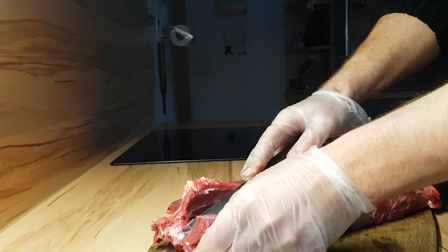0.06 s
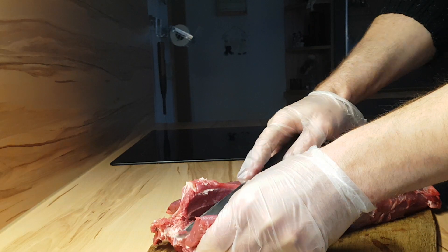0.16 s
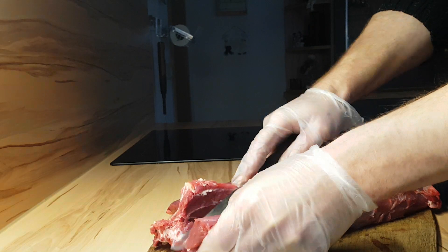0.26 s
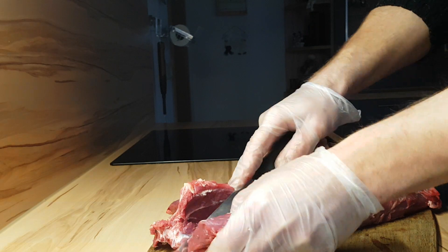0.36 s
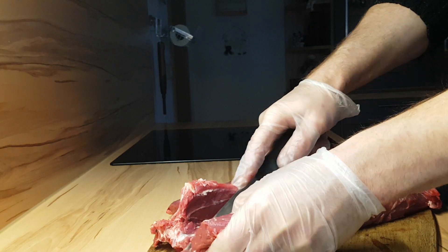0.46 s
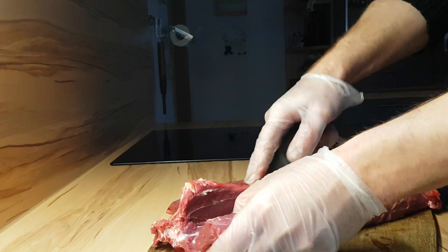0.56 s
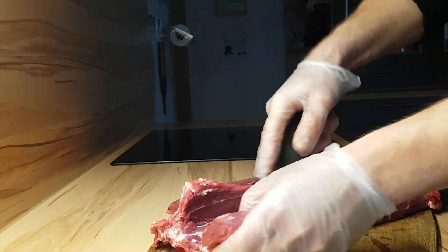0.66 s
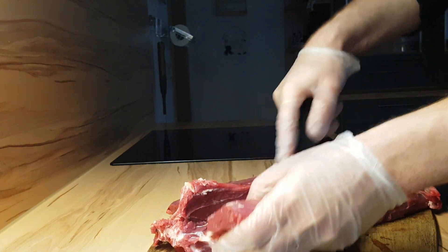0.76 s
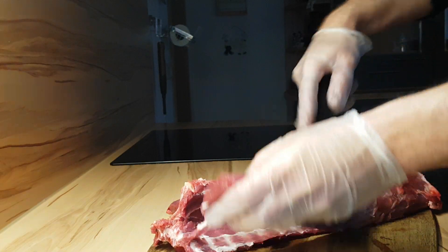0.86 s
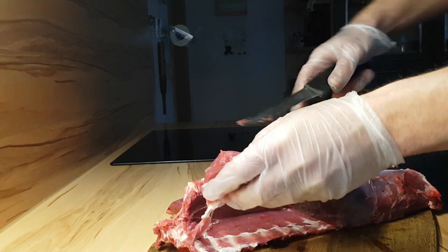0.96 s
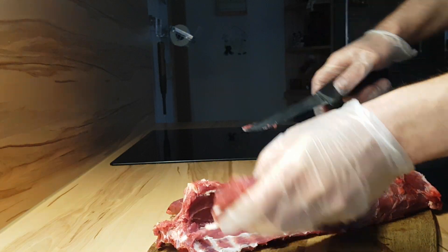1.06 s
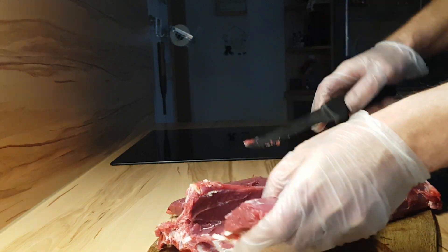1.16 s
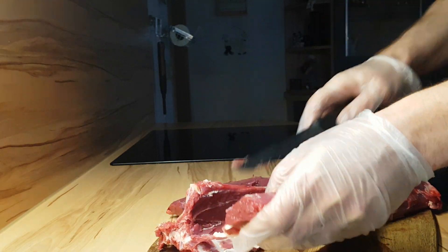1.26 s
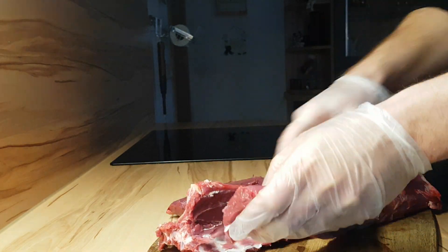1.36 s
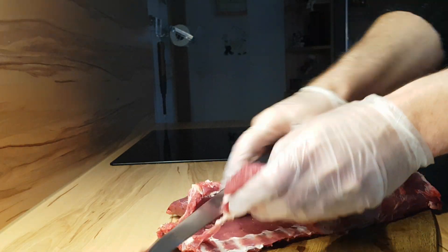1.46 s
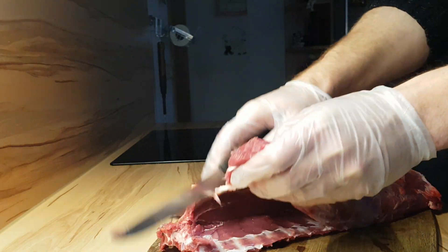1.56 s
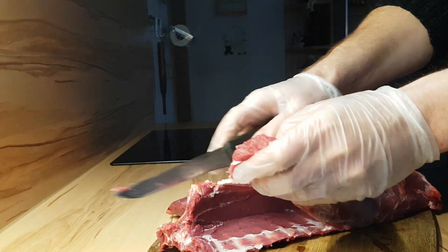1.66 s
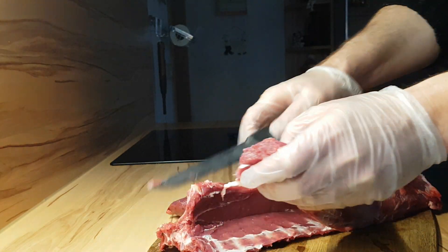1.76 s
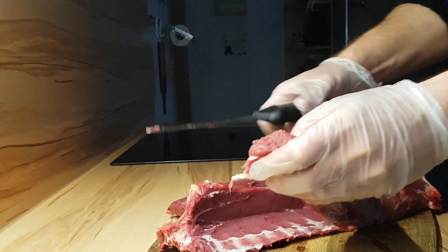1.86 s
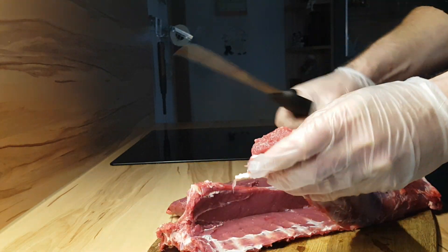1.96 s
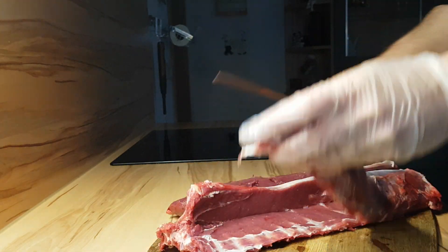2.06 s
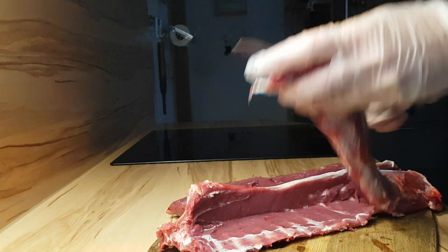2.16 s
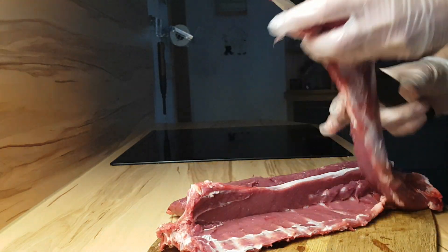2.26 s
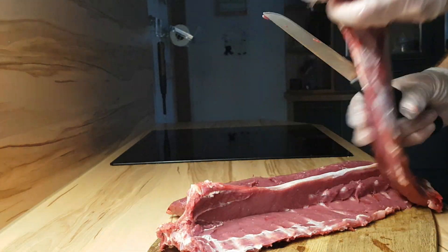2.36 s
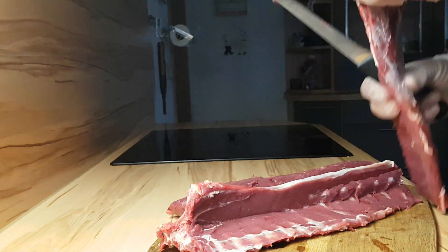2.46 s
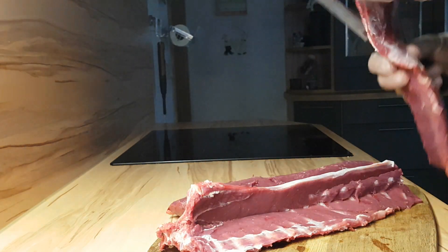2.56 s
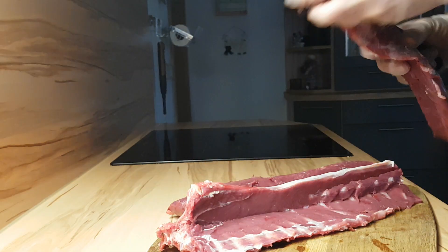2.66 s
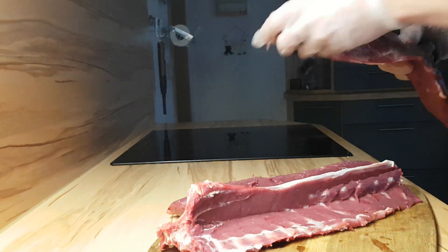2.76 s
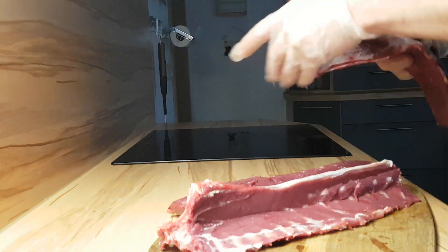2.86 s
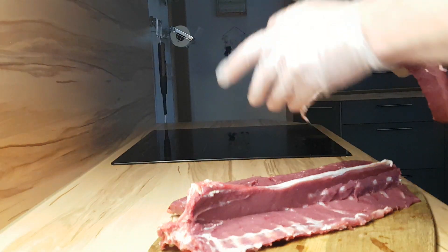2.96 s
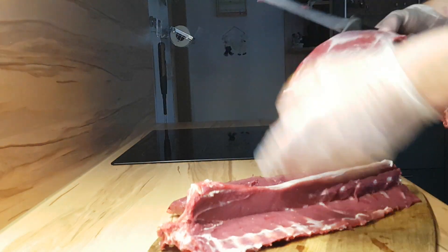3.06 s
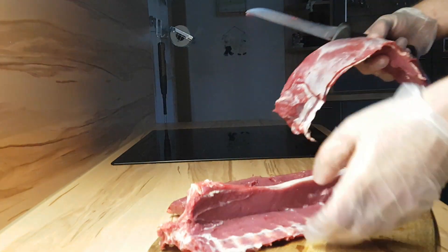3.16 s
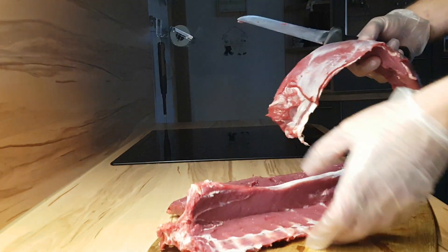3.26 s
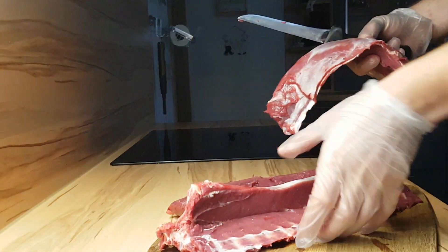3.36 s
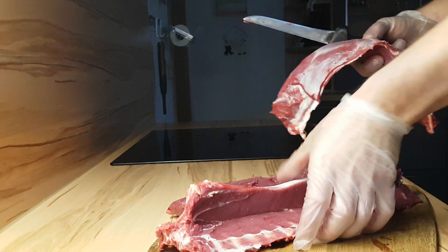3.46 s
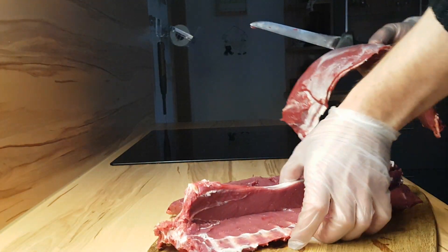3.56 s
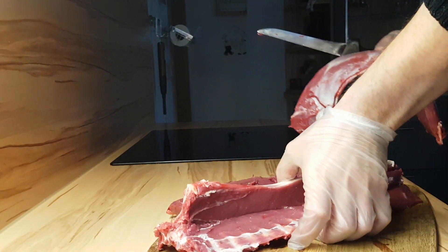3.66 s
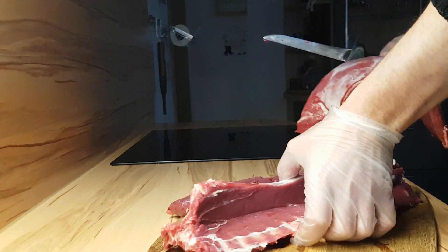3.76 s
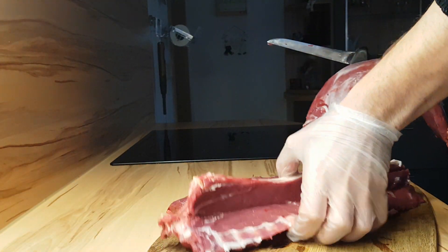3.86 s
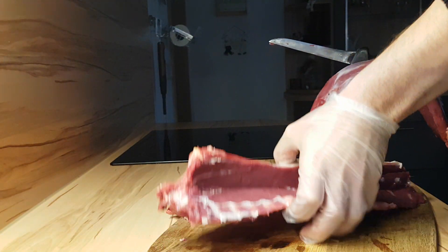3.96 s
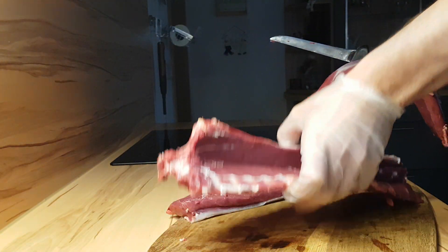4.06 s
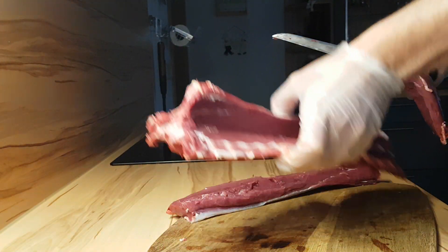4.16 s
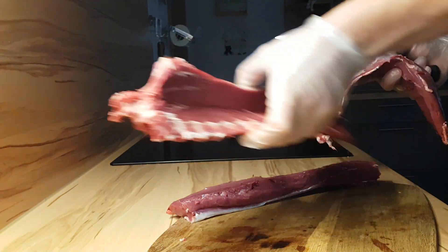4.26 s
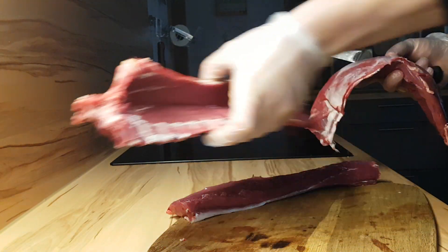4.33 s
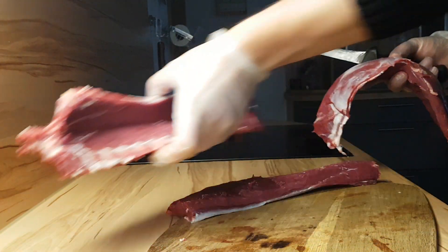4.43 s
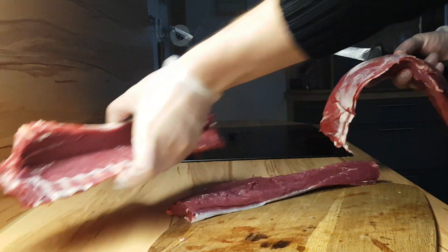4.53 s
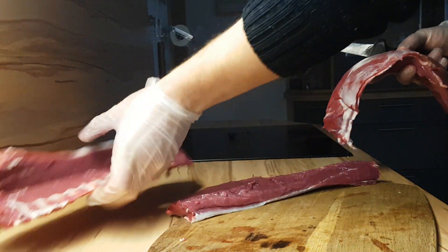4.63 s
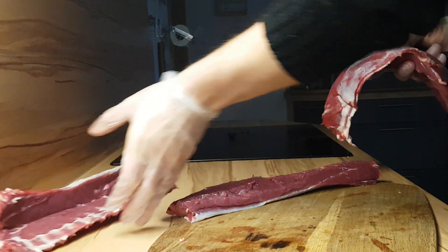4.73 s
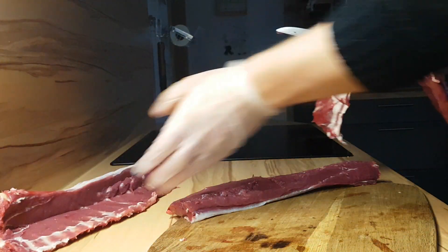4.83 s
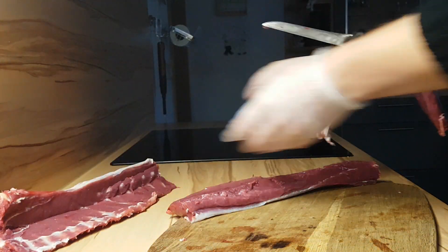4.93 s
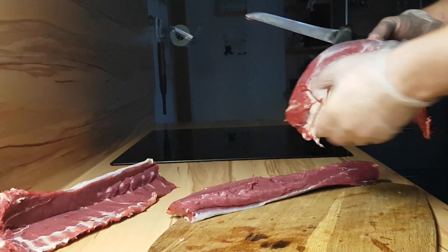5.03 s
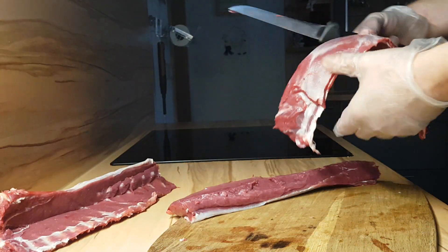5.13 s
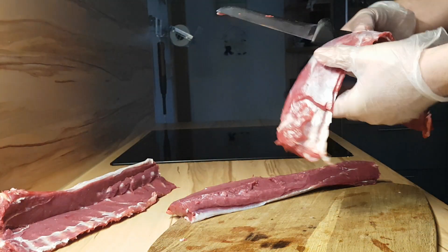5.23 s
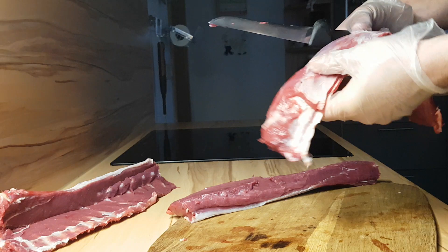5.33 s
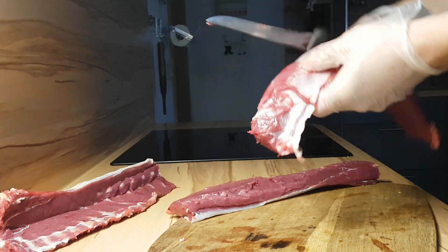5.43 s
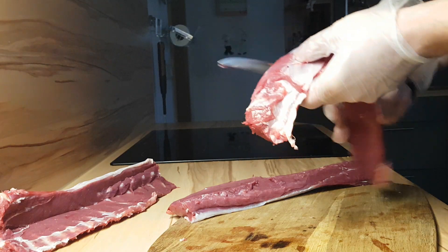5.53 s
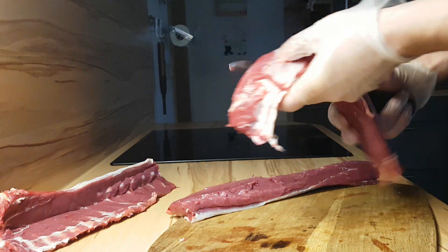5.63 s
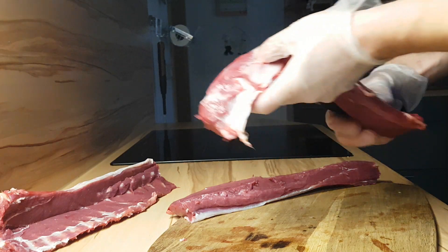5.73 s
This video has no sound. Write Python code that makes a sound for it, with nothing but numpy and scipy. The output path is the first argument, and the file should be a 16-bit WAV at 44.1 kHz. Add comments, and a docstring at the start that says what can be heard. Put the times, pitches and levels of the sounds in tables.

```python
"""Boning ribs in a quiet kitchen

A knife clicks on bone, meat flops onto a wooden board, gloved hands rub and peel it, and a rack of ribs
is dropped on the worktop, one edge first. Wood and steel are sums of decaying modes driven by a contact
push; slaps, tears, rubbing and squelches are shaped noise. The hard-walled room answers the work with a
decaying noise tail, over still air and a faint mains and appliance hum."""
import sys
import numpy as np
from scipy import signal
from scipy.fft import rfft, irfft
from scipy.io import wavfile
from scipy.ndimage import uniform_filter1d

SR = 44100
rng = np.random.default_rng(int(sys.argv[2]) if len(sys.argv) > 2 else 0)


def waveform_to_disk(signal):
    """Save audio, clipped to [-1, 1], as 16-bit WAV at the path in sys.argv[1]."""
    frames = np.transpose(np.atleast_2d(signal))
    scaled = np.clip(frames, -1, 1) * 32767
    samples = np.round(scaled).astype(np.int16)
    wavfile.write(sys.argv[1], SR, samples)


N = 255339
TIME = np.arange(N) / SR  # s
RING = TIME[:SR // 2]  # the half second given to each single sound, s

# vibration modes of the wooden board: [hz, level_db, t60_s]
BOARD_MODES = [(122, -21, 0.76), (184, -14, 0.04), (223, 2, 0.045), (229, -4, 0.068), (401, 0.5, 0.071),
               (435, -9, 0.12), (493, -3.5, 0.1), (633, -11, 0.15)]
# blade clicks on bone, each of which also splits wet flesh: [start_s, level_db]
BONE_CLICKS = [(.3445, -47.5), (.352, -44.5)]
# spectrum of a wet glove or of wet fibres parting: [hz, level_db]
WET_SPECTRUM = [(400, 3), (1000, 1.5), (1650, 2), (2400, 3), (4000, 2), (5500, -2.5), (9000, -6.5),
                (16000, -11)]
# a glove takes hold and slides, squeak relative to rub: [middle_s, length_s, level_db, squeak_db]
GLOVE_GRIPS = [(0.38, 0.084, -63.5, -11), (0.72, 0.063, -70.5, -15), (1.862, 0.1, -72, -10),
               (2.904, 0.12, -65, -9), (3.335, 0.078, -58.5, -1.5), (3.477, 0.043, -67.5, 2),
               (3.618, 0.1, -64, -2.5), (5.389, 0.11, -65.5, -14), (5.629, 0.051, -68, -12),
               (5.79, 0.05, -65.5, -12)]
# wet meat peels off blade, bone or glove: [middle_s, length_s, level_db]
MEAT_PEELS = [(0.319, 0.021, -60), (1.02, 0.08, -68.5), (2.026, 0.083, -56.5), (2.173, 0.066, -62.5),
              (2.329, 0.23, -70), (3.975, 0.085, -59.5), (4.075, 0.039, -62), (4.721, 0.042, -58),
              (5.488, 0.05, -57.5)]
# the hand bears down, skid relative to squelch: [middle_s, length_s, level_db, skid_db]
HAND_PRESSES = [(0.609, 0.06, -60, -13.5), (1.238, 0.07, -57, -11.5), (1.452, 0.04, -59.5, -6.5),
                (1.541, 0.068, -60, -20), (3.314, .025, -62.5, -4), (3.595, 0.05, -59.5, -1),
                (3.786, 0.03, -55, -2.5), (3.852, 0.05, -55.5, 0.5), (3.913, 0.046, -61.5, -10),
                (4.011, 0.035, -59, -1)]


def undb(db):
    """Amplitude ratio of a level in decibels."""
    return 10 ** (np.asarray(db) / 20)


def unit(x):
    """Normalization to a root-mean-square value of 1."""
    return x / np.sqrt(np.mean(x ** 2))


def along(points, hz):
    """Linear interpolation of (hz, value) points on a logarithmic frequency axis."""
    point_hz, value = np.transpose(points)
    return np.interp(np.log(hz + 1), np.log(point_hz), value)


def causal(x, log_gain):
    """Minimum-phase filtering by the folded cepstrum: nothing sounds before its cause."""
    size = x.shape[-1]
    cepstrum = irfft(log_gain, size)
    cepstrum[..., 1:size // 2] *= 2
    cepstrum[..., size // 2:] = 0
    response = np.exp(rfft(cepstrum))
    return irfft(rfft(x) * response, size)


def colour(x, points, tilt=0):
    """Spectral shaping by a response curve plus a tilt in dB per octave about 1 kHz."""
    hz = np.fft.rfftfreq(x.shape[-1], 1 / SR)
    octaves = np.log2(np.maximum(hz, 500) / 1000)  # the tilt stops below 500 Hz
    gain_db = along(points, hz) + tilt * octaves
    return causal(x, np.log(undb(gain_db)))


def low_cut(x, hz):
    """Third-order high-pass: a small surface radiates little at long wavelengths."""
    return signal.sosfilt(signal.butter(3, hz, "high", fs=SR, output="sos"), x)


def pair(size, alike):
    """Partial coherence: left and right white noise with the correlation `alike`."""
    c = np.clip(alike, 0, 1)
    shared = rng.standard_normal(size)
    separate = rng.standard_normal((2, size))
    return np.sqrt(c) * shared + np.sqrt(1 - c) * separate


def walk(rate, size=N):
    """Slow modulation: random values with a spread near 1, `rate` per second, joined by lines."""
    steps = rng.standard_normal(size // 20)
    return np.interp(TIME[:size] * rate, np.arange(len(steps)), steps)


def add(out, s, sound):
    """Superposition of a sound from time s onward."""
    i = int(s * SR)
    out[:, i:i + sound.shape[-1]] += sound[..., :N - i]


def swell(length):
    """A rounded envelope centred in the half second; `length` spans its points at 61 % of the peak."""
    return np.exp(-np.abs(2 * (RING - RING.mean()) / length) ** 2.24 / 2)


def strokes(moves):
    """Amplitude envelopes of movements (middle_s, length_s, level_db, sound): each swells and fades."""
    out = np.zeros((2, N))
    for s, length, db, sound in moves:
        add(out, s - RING.mean(), undb(db) * swell(length) * sound)
    return out


def strike(modes, contact_ms):
    """Modal excitation by a push; a longer, softer contact leaves only the low modes."""
    ring = np.zeros(len(RING))
    for hz, db, t60 in modes:
        ring += undb(db - 60 * RING / t60) * np.sin(2 * np.pi * hz * RING)
    ms = RING * 1000
    push = ms * np.exp(-2 * np.pi * ms / max(contact_ms, .1))
    return signal.fftconvolve(ring, push / push.sum())[:len(RING)]


def splat(spectrum, tilt, decay_ms, alike):
    """Aperiodic radiation as air and juice leave a wet contact: a dying crackle without pitch."""
    fade = np.exp(-RING * 1000 / decay_ms)
    burst = pair(len(RING), alike) * fade
    power = uniform_filter1d(np.abs(rfft(burst)) ** 2, size=60)
    even = causal(burst, -np.log(power) / 2)  # flatten before colouring
    return unit(colour(even, spectrum, tilt)) * np.sqrt(np.mean(fade ** 2))


def rub(spectrum, tilt=0):
    """Friction noise of a sliding wet contact, tilted in dB per octave."""
    return unit(colour(pair(len(RING), alike=0.2), spectrum, tilt))


def diffuse(x):
    """Spectral smoothing of a noise tail, so that no chance resonance stands out."""
    power = uniform_filter1d(np.abs(rfft(x)) ** 2, size=21)
    return causal(x, -np.log(power / power.mean()) / 2)


def background():
    """Ambient noise, coherent between the sides in the bass, and hum of wavering level and phase."""
    # spectrum of the still air: [hz, level_db]
    air_spectrum = [(45, -9), (75, 0), (115, 2.5), (200, -2.5), (480, -4), (650, -8), (900, -9.5),
                    (1600, -14), (3000, -17.5), (6500, -27.5), (10000, -28.5), (15500, -22)]
    # mains and appliance hum, mean level: [hz, level_db]
    hum_tones = [(49, -77.5), (98, -74.5), (344.5, -80), (490, -74), (10896, -100)]
    air_db = -65  # rms over both sides
    mid, side = pair(N, alike=0)
    side = low_cut(side, hz=286) + 0.3 * side
    air = low_cut(colour(np.array([mid + side, mid - side]), air_spectrum), hz=40)
    hum = np.zeros(N)
    for hz, db in hum_tones:
        level = undb(db + 1.5 * walk(3.8))
        hum += level * np.sin(2 * np.pi * hz * TIME + 0.66 * walk(4.4))
    return undb(air_db) * unit(air) + hum


def kitchen(dry, wet_db, build_s, apart_hz):
    """Reverberation: a dense tail loses its treble first; long waves reach both sides alike."""
    # reverberation time: [hz, t60_s]
    room_t60 = [(100, 0.44), (1200, 0.44), (3000, 0.44), (6000, 0.36), (12000, 0.26)]
    # spectrum of the echo: [hz, level_db]
    echo_spectrum = [(100, -3), (220, 2.5), (300, 3), (450, 4.5), (800, -0.5), (1400, 1.5), (3000, -2),
                     (15000, -4)]
    hz, t, cells = signal.stft(pair(int(.7 * SR), alike=0), SR, nperseg=256)
    fade = undb(-60 * t / along(room_t60, hz)[:, None])
    echoes = signal.istft(cells * fade, SR)[1]
    build = 1 - np.exp(-(TIME[:echoes.shape[1]] / build_s) ** 2)
    mid, side = colour(diffuse(echoes * build), echo_spectrum)
    side = low_cut(side, apart_hz)
    tail = np.array([mid + side, mid - side])
    return undb(wet_db) * signal.fftconvolve(dry, tail, axes=1)[:, :N]


def faint_tone(s, length, hz, db):
    """A pure tone under a smooth envelope: low and faint, it swells and fades."""
    return strokes([(s, length, db, np.sin(2 * np.pi * hz * RING))])


def board_bumps():
    """Soft-contact excitation of the board as it is bumped in the work and pushed by each press."""
    # bumps as the knife works and the meat is moved: [start_s, level_db]
    nudges = [(0.31, -43.5), (0.326, -40.5), (0.377, -44.5), (.398, -42), (0.453, -46.5), (1.088, -47.5),
              (4.079, -49)]
    push_db = 3.5  # relative to the squelch of the press
    out = np.zeros((2, N))
    bump = strike(BOARD_MODES, contact_ms=4.8)
    push = strike(BOARD_MODES, contact_ms=2.14)
    for s, db in nudges:
        add(out, s, undb(db) * bump)
    for s, length, db, _ in HAND_PRESSES:
        add(out, s - length / 2, undb(db + push_db) * push)
    return low_cut(out, hz=108)


def wet_tacks():
    """Adhesion release: short wet crackles as meat and gloves come unstuck."""
    # tilt in dB per octave: [start_s, level_db, tilt_db]
    tacks = [(.607, -59.5, 6.5), (1.235, -60, 5), (2.703, -52, 1), (3.451, -50, -8.5), (3.991, -53, 4),
             (4.72, -43.5, -3), (5.612, -51.5, 0)]
    out = np.zeros((2, N))
    for s, db, tilt in tacks:
        add(out, s, undb(db) * splat(WET_SPECTRUM, tilt, decay_ms=5, alike=0.22))
    return low_cut(out, hz=108)


def squelch():
    """Collapse of small air pockets under wet meat: a dull, lumpy gurgle."""
    # spectrum of the air pockets: [hz, level_db]
    pockets = [(70, -21.5), (140, 3.5), (220, 13.5), (310, -10), (500, -2), (1000, -9.5), (3000, -31)]
    pops = pair(len(RING), alike=.8) * undb(3.5 * walk(500, size=len(RING)))
    return unit(colour(pops, pockets))


def squelches():
    """Compression of wet meat by every movement: a press fully, a grip or a peel only lightly."""
    # squelch relative to the level of each movement, dB
    kinds = [(HAND_PRESSES, 0), (GLOVE_GRIPS, -10), (MEAT_PEELS, -14)]
    moves = []
    for rows, squeeze_db in kinds:
        for s, length, db, *_ in rows:
            moves.append((s, length, db + squeeze_db, squelch()))
    return strokes(moves)


def squeak():
    """Stick-slip of taut rubber: narrow-band chatter, stretched a little differently in each grip."""
    # spectrum of the squeak before stretching: [hz, level_db]
    squeak_band = [(2400, -38), (2950, -1), (3150, 6.5), (3500, -5), (4500, -19)]
    slips = pair(len(RING), alike=.3) * undb(5.5 * walk(260, size=len(RING)))
    stretch = np.exp(.025 * rng.standard_normal())
    return unit(colour(slips, [(hz * stretch, db) for hz, db in squeak_band]))


def gloves():
    """Sliding friction in tiny uneven slips: grips squeak, peels hiss and presses skid dully."""
    # bright hiss of peeling: [hz, level_db]
    peel_spectrum = [(500, -2.5), (1500, 1.5), (2300, 6.5), (3200, 4.5), (4500, 1.5), (7000, 1),
                     (11000, -1.5), (16000, -2.5)]
    moves = []
    for s, length, db, squeak_db in GLOVE_GRIPS:
        moves.append((s, length, db, rub(WET_SPECTRUM, tilt=-0.12) + undb(squeak_db) * squeak()))
    for s, length, db in MEAT_PEELS:
        moves.append((s, length, db, rub(peel_spectrum)))
    for s, length, db, skid_db in HAND_PRESSES:
        moves.append((s, length, db + skid_db, rub(WET_SPECTRUM, tilt=-2.8)))
    slip_db = 2 * walk(110) + 3.2 * walk(1200)
    return low_cut(strokes(moves) * undb(slip_db), hz=131)


def tearing():
    """Fracture as the loin leaves the ribs: fine fibres tick at uneven gaps, thick strands snap."""
    # strands of membrane snapping: [start_s, level_db]
    snaps = [(2.285, -53), (2.33, -51.5), (2.404, -51)]
    # span of the pull: start_s, end_s
    tear_span = (2.13, 2.47)
    fibres_per_s = 40
    loudest_db, range_db = -53.5, 12  # fibres fall up to the range below the loudest
    out = np.zeros((2, N))
    for s, db in snaps:
        add(out, s, undb(db) * splat(WET_SPECTRUM, tilt=6.5, decay_ms=3.9, alike=0.13))
    for s in np.arange(*tear_span, 1 / fibres_per_s):
        db = loudest_db - range_db * rng.random()
        tick = splat(WET_SPECTRUM, tilt=11, decay_ms=2.3, alike=0.22)
        add(out, s + rng.random() / fibres_per_s, undb(db) * tick)
    return out


def flesh_cuts():
    """Rupture of wet flesh: a short crackle with each click of the blade."""
    cut_db = -0.5  # relative to the click
    out = np.zeros((2, N))
    for s, db in BONE_CLICKS:
        add(out, s, undb(db + cut_db) * splat(WET_SPECTRUM, tilt=-3.5, decay_ms=10, alike=0.27))
    return low_cut(out, hz=108)


def blade():
    """Modal ringing of steel after a brief, hard contact with bone."""
    # modes of blade against bone: [hz, level_db, t60_s]
    blade_modes = [(903, 0, 0.034), (1170, -6, 0.042), (1515, 3, 0.05), (2225, 1.5, 0.047),
                   (2850, -1, 0.042), (3570, -22, 0.017)]
    out = np.zeros((2, N))
    for s, db in BONE_CLICKS:
        add(out, s, undb(db) * strike(blade_modes, contact_ms=0.36))
    return out


def landings(blows, modes, slap_spectrum, lowest_hz):
    """Impact of a soft body: the wood thuds in its modes and the wet face slaps."""
    out = np.zeros((2, N))
    for s, thud_db, contact_ms, slap_db, decay_ms, tilt in blows:
        add(out, s, -undb(thud_db) * strike(modes, contact_ms))
        add(out, s, undb(slap_db) * splat(slap_spectrum, tilt, decay_ms, alike=0.12))
    return low_cut(out, lowest_hz)


def meat_flop():
    """Impact of limp meat on the board, exciting board modes and a wet slap."""
    # tilt in dB per octave: [start_s, thud_db, contact_ms, slap_db, slap_decay_ms, slap_tilt_db]
    flops = [(.7572, -47, 2.2, -28.5, 7.6, -1), (.7612, -22, 1.44, -30.5, 8.3, -7)]
    # spectrum of the slap: [hz, level_db]
    meat_spectrum = [(80, -13), (560, 1.5), (800, -10), (1200, -5), (1600, -1), (2300, -5), (3100, -1.5),
                     (5000, -10.5), (9000, -16.5), (16000, -30)]
    return landings(flops, BOARD_MODES, meat_spectrum, lowest_hz=162)


def rack_drop():
    """Successive impacts of the rack of ribs, one edge first, exciting the worktop modes."""
    # tilt in dB per octave: [start_s, thud_db, contact_ms, slap_db, slap_decay_ms, slap_tilt_db]
    drops = [(4.758, -34.5, 3.6, -23, 30, -0.5), (4.7625, -15, 4.5, -27, 18, -1),
             (4.7855, -37.5, 1.9, -19.5, 7.2, 0.5), (4.7885, -14.5, 1.02, -13.5, 9.6, -6.5),
             (4.872, -42, 2, -27, 2.4, -4.5)]
    # modes of the worktop: [hz, level_db, t60_s]
    worktop_modes = [(107.3, -7.5, 0.34), (126.8, -3.5, 0.25), (155.3, -12.5, .22), (191.4, -3, 0.12),
                     (208.6, -4.5, .22), (238, -10.5, 0.2), (378, -10, 0.1), (444, -10.5, 0.11),
                     (498.3, -6.5, 0.14), (669, -6, 0.14), (838, -12.5, 0.088), (933, -14, 0.093),
                     (1180, -12, 0.069)]
    # spectrum of the slap: [hz, level_db]
    rib_spectrum = [(70, -28), (150, -7.5), (310, -11.5), (450, 1.5), (750, 4), (1400, 0), (2200, -2.5),
                    (3200, -5.5), (6500, -13.5), (9000, -20), (16000, -26.5)]
    return landings(drops, worktop_modes, rib_spectrum, lowest_hz=86)


def scene():
    """Superposition of direct sound, just in front of the microphone, with room and background."""
    # level of the work area, left minus right: [hz, level_db]
    balance = [(60, -1), (200, -3.5), (380, -3.5), (700, -3.5), (2400, 0), (5500, 3.5)]
    blade_room_db = -7  # the thin blade sends little into the room
    dry = board_bumps() + wet_tacks() + squelches() + gloves() + tearing() + flesh_cuts()
    dry = dry + meat_flop() + rack_drop()
    steel = blade()
    to_room = dry + undb(blade_room_db) * steel
    sound = dry + steel + kitchen(to_room, wet_db=-35.5, build_s=0.015, apart_hz=422)
    left = colour(sound[0], [(hz, db / 2) for hz, db in balance])
    right = colour(sound[1], [(hz, -db / 2) for hz, db in balance])
    tone = faint_tone(s=5.485, length=0.13, hz=211.5, db=-60)
    return np.array([left, right]) + tone + background()


def record(dry):
    """Band limitation: the recorder cuts steeply above 15850 Hz."""
    return signal.sosfilt(signal.ellip(10, .1, 70, 15850, fs=SR, output="sos"), dry)


dry = scene()
out = record(dry)
waveform_to_disk(out)
```